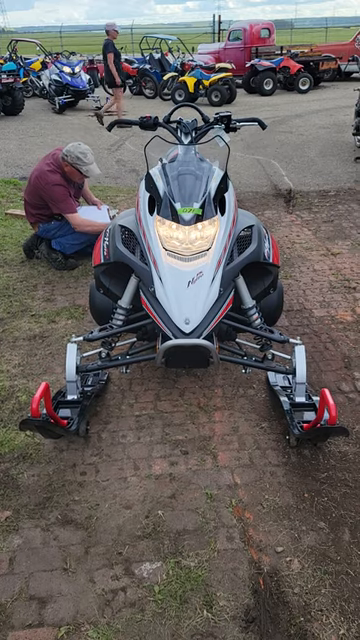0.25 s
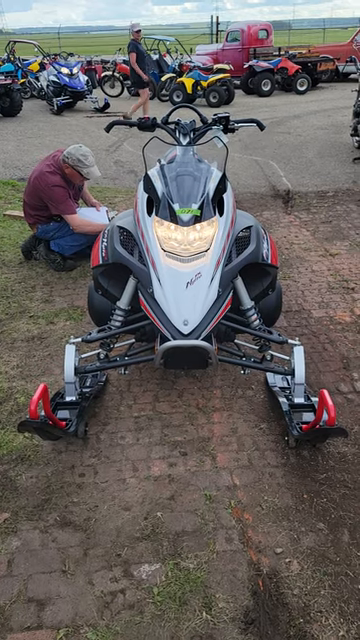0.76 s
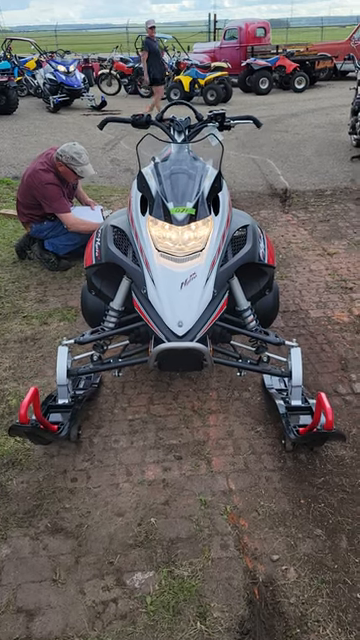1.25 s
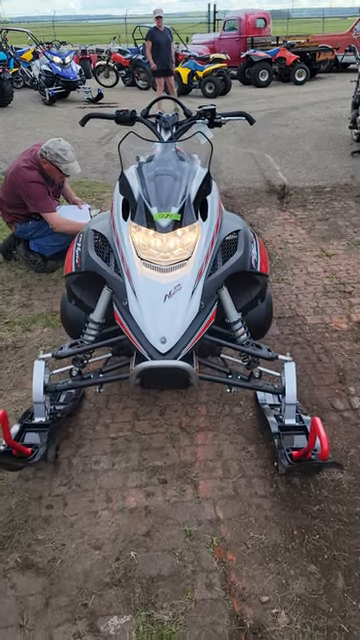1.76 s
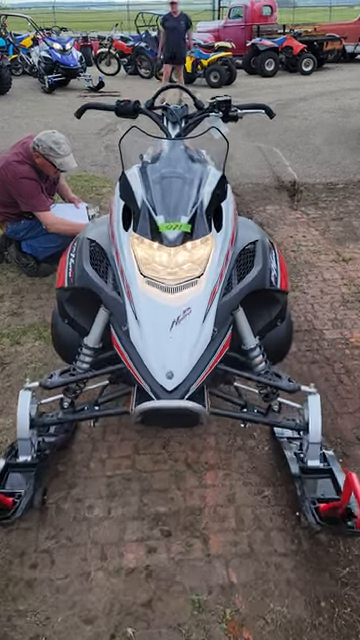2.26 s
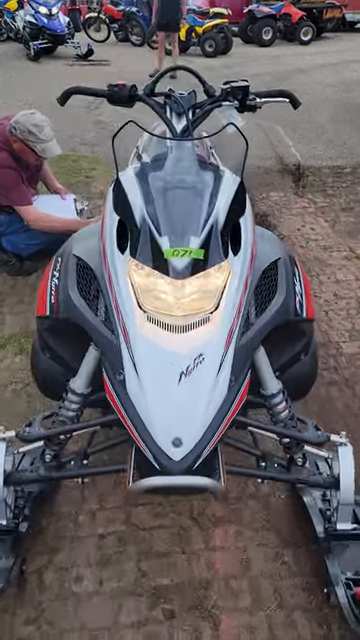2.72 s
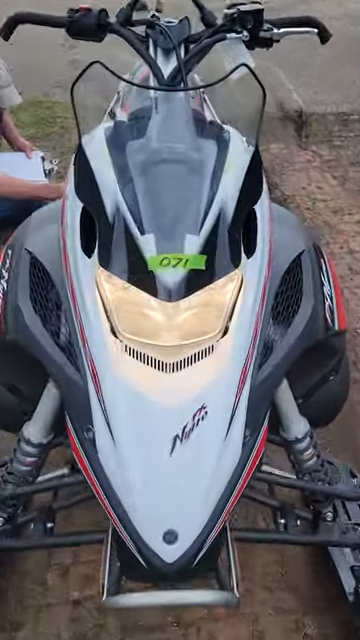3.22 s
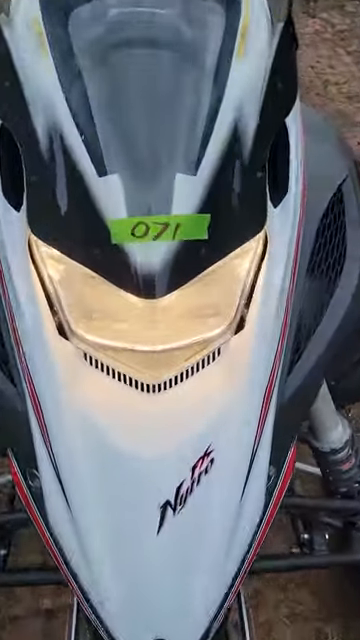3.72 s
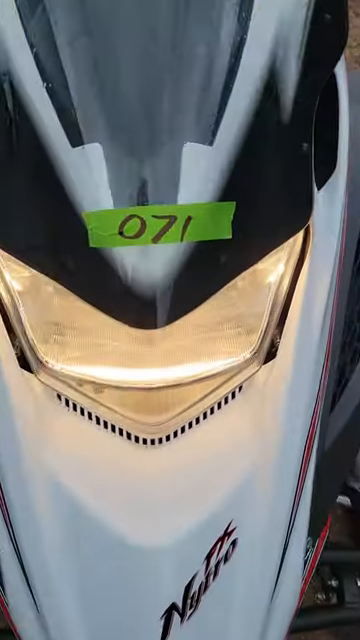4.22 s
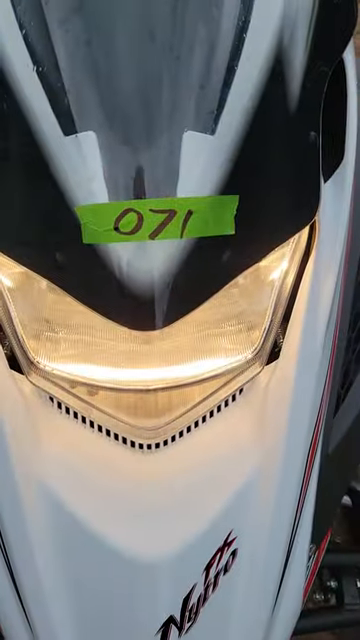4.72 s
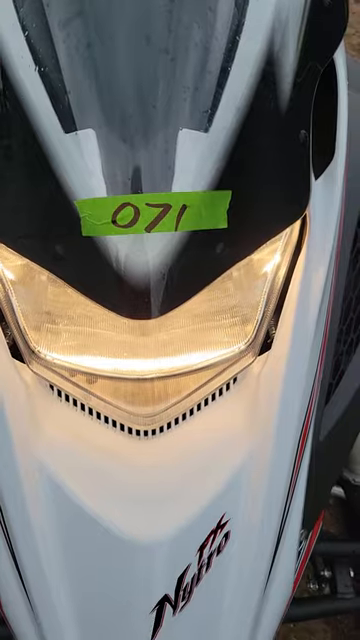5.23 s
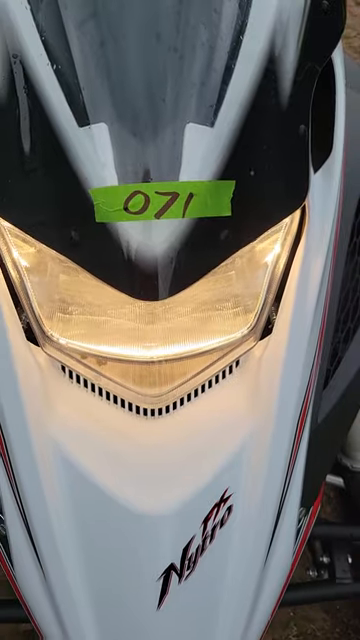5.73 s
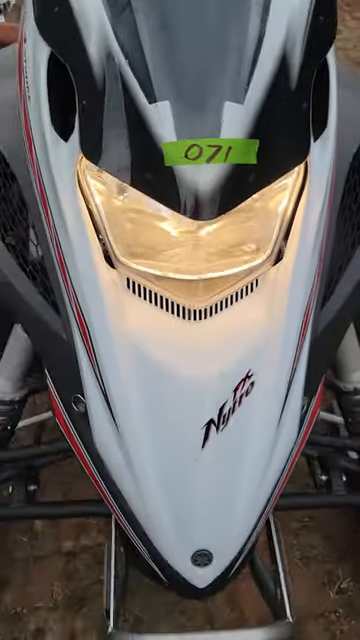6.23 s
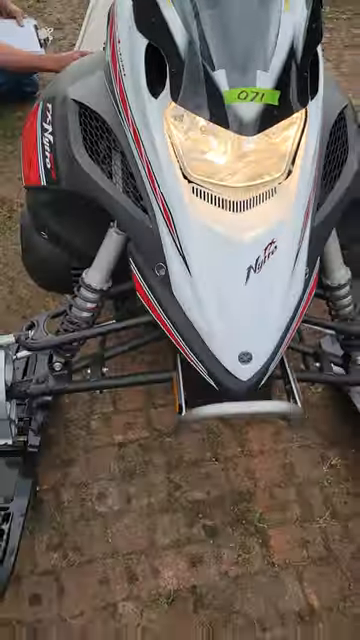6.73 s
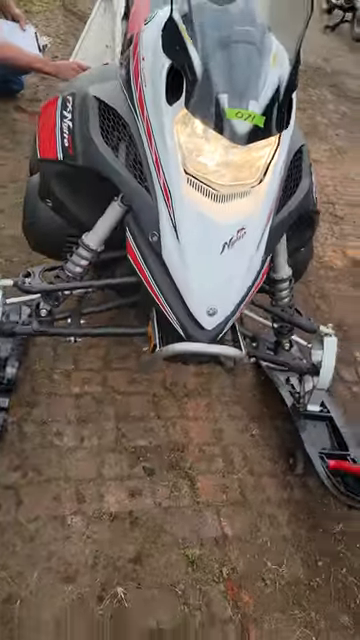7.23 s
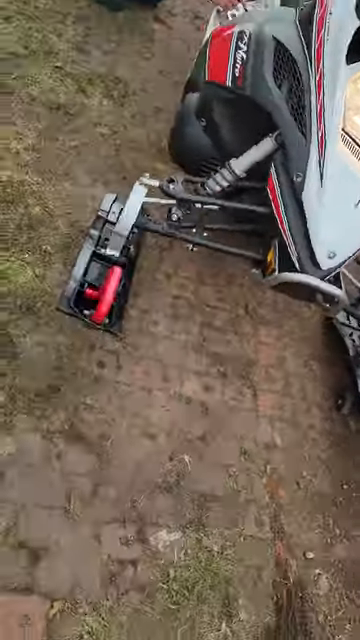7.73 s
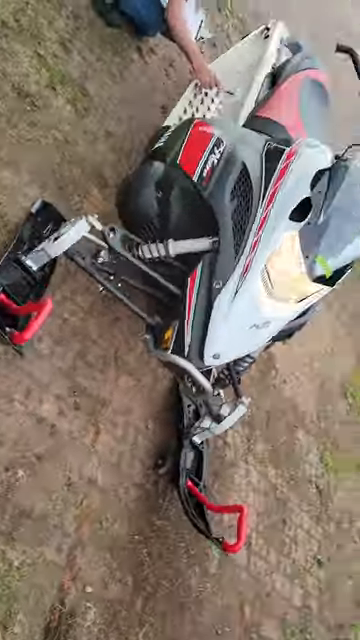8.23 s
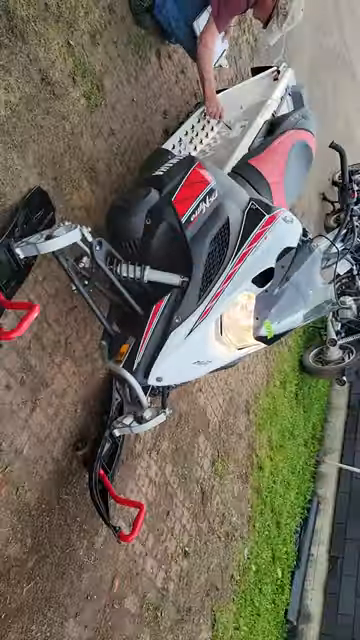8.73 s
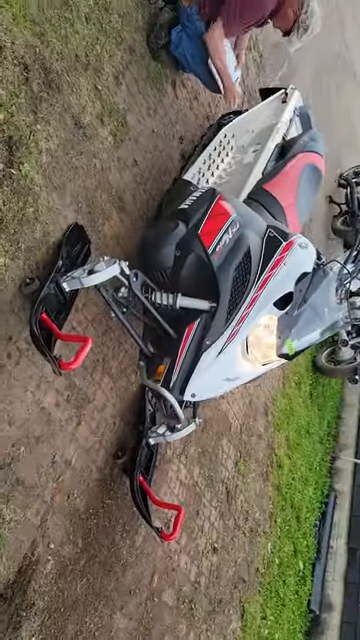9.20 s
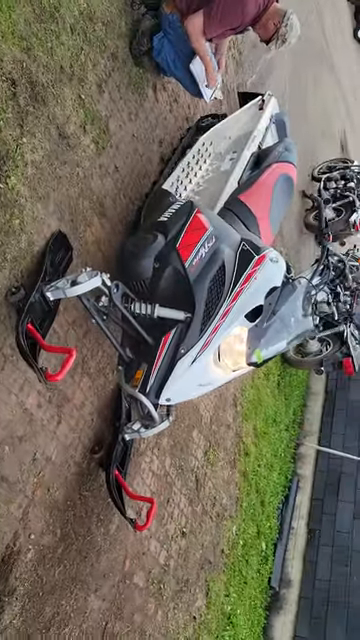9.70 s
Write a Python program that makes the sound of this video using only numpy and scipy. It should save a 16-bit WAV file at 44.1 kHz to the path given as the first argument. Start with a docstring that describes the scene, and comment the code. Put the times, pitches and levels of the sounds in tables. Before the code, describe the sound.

A three-cylinder snowmobile engine idles without stopping in an open yard. A deep exhaust drone throbs under dense mechanical clatter and hiss. The handheld microphone starts a little way off in front, moves in over the hood so the clatter gets louder and brighter, then backs away and around to the side.

```python
"""After a very short silence a three-cylinder four-stroke snowmobile engine idles in an open yard: an exhaust
drone on multiples of the firing rate under clatter, as the listener walks up, leans over the hood and steps
to the side. Phase-locked sines make the drone and coloured noise the rumble; contact impulses and hiss ring
through the hood panels, intake strokes excite airbox modes, a panel and an electric pump sing, one tick snaps."""
import sys
import numpy as np
from scipy import signal
from scipy.fft import rfft, irfft
from scipy.io import wavfile
from scipy.ndimage import uniform_filter1d, map_coordinates

SR = 44100
rng = np.random.default_rng(int(sys.argv[2]) if len(sys.argv) > 2 else 0)


def bounce(signal):
    """Save signal as a 16-bit WAV file at the path given by the first command-line argument."""
    frames = np.transpose(np.atleast_2d(signal))
    limited = np.clip(frames, -1, 1)
    pcm = np.round(limited * 32767).astype(np.int16)
    wavfile.write(sys.argv[1], SR, pcm)


N = 439236

# Throughout, values at "four places" are in front, at the corner, at the side, over the hood.
# unequal firing strength of the three cylinders: level/dB
CYLINDER_LEVELS = (-4., 0., 1.5)


def from_db(db):
    """Amplitude ratio from a level: 20 dB is a factor of ten."""
    return np.exp(np.asarray(db) * (np.log(10) / 20))


def rms_one(x):
    """Normalize the mean square, the signal power, to 1."""
    return x / np.sqrt(np.mean(x ** 2) + 1e-20)


def in_time(rows):
    """Linear interpolation of each column of a time table at every sample."""
    s, *columns = np.transpose(rows)
    return [np.interp(np.arange(N) / SR, s, c) for c in columns]


def at_hz(points, hz):
    """Spectrum table interpolated on a logarithmic frequency axis."""
    table_hz, values = np.transpose(points)
    return np.interp(np.log(hz), np.log(table_hz), values)


def drift(rate_hz):
    """Slow random fluctuation of rms 1: white noise through two equal low-pass poles."""
    step = 40      # the slow curve is drawn at every 40th sample
    r = np.exp(-2 * np.pi * rate_hz * step / SR)
    noise = rng.standard_normal(N // step + 2002)
    slow = signal.lfilter([1], [1, -2 * r, r * r], noise)[2000:]
    return np.interp(np.arange(N) / step, np.arange(len(slow)), rms_one(slow))


def dip(s, width_s, db):
    """A brief Gaussian change of level in dB."""
    return db * np.exp(-((np.arange(N) / SR - s) / width_s) ** 2)


def resonance(x, hz, width_hz):
    """One damped mode: a two-pole resonance of about unit gain at its peak."""
    r = np.exp(-np.pi * width_hz / SR)
    poles = [1, -2 * r * np.cos(2 * np.pi * hz / SR), r * r]
    return signal.lfilter([(1 - r * r) / 2, 0, (r * r - 1) / 2], poles, x)


def coloured(pair, spectrum):
    """Partial coherence: mix mid and side into a coloured left-right spectrum; returns (Hz, spectrum)."""
    # left-right correlation: f/Hz, likeness
    likeness = [(60, 1), (250, 0.16), (600, 0.28), (1400, 0.2), (3000, 0.1), (7000, 0.067), (15000, .1)]
    mid, side = rfft(pair)
    hz = np.maximum(np.arange(len(mid)) * SR / N, 5.)
    alike = np.clip(at_hz(likeness, hz), -1, 1)
    ports = np.sqrt(1 + alike) * mid + np.sqrt(1 - alike) * side * [[1], [-1]]
    return hz, from_db(at_hz(spectrum, hz)) * ports


def places():
    """Weights of the four places at each moment: interpolation between fixed listening positions."""
    # the walk: t/s, lean (0 standing off, 1 over the hood), turn (0 in front, .5 at the corner, 1 at the side)
    walk = [(0, 0.02, 0), (1.6, 0.029, 0), (2.4, 0.24, 0), (2.9, 0.47, 0.012), (3.6, .87, 0.13),
            (4.1, 1, 0.11), (5.6, 0.92, 0), (6.1, 0.89, 0.56), (6.7, 0.34, 0.43), (6.86, 0.27, 0.52),
            (7.2, 0.12, .5), (7.7, 0, 0.63), (8.1, 0.11, 0.71), (8.3, 0.18, 0.82), (8.8, 0.05, 0.97),
            (10, 0, 0.89)]
    lean, turn = np.clip(in_time(walk), 0, 1)
    standing = [(1 - lean) * np.interp(turn, (0, .5, 1), tent) for tent in np.eye(3)]
    return np.array([*standing, lean])


def placed(row, shares):
    """Level in dB and left-right gains at each moment: level difference gives direction."""
    db, pan_db = np.reshape(row, (2, 4)) @ shares
    return db, from_db([pan_db / 2, -pan_db / 2])


def lag_left(pair, lag_s):
    """Interaural-style time difference: read the left channel a changing time later."""
    moments = np.arange(N) - lag_s * SR
    left = map_coordinates(pair[0], [moments], order=3, mode="nearest")
    return np.array([left, pair[1]])


def strikes(turns, share, db, spread_db):
    """Periodic impulses of uneven strength, one each time the count passes this share of a turn."""
    passed = np.diff(np.floor(turns - share), prepend=np.floor(turns[0] - share)) > 0
    out = np.zeros(N)
    out[passed] = from_db(db + spread_db * rng.standard_normal(passed.sum()))
    return out


def combustions(firings, lead, spread_db):
    """Firing order: one impulse a firing, the cylinders in turn, three to a four-stroke cycle."""
    cycles = firings / 3 + lead
    return sum(strikes(cycles, k / 3, db, spread_db) for k, db in enumerate(CYLINDER_LEVELS))


def ticks(decay_s):
    """Impulsive radiation: exponentially decaying noise snaps, high-passed to be bright."""
    # lone bright tick: t/s, level/dB of the noise at onset before the high-pass, left minus right/dB
    snaps = [(7.1964, -35, 4)]
    length = 400
    out = np.zeros((2, N))
    tail = np.exp(-np.arange(length) / (decay_s * SR))
    for s, db, pan_db in snaps:
        noise = rng.standard_normal((2, length))
        i = round(s * SR)
        out[:, i:i + length] += from_db(db) * noise * tail * from_db([[pan_db / 2], [-pan_db / 2]])
    return signal.sosfilt(signal.butter(2, 4000, "high", fs=SR, output="sos"), out)


def pump(shares):
    """Doppler effect on an unsteady electric whine: sharp as the listener closes in, flat on moving off."""
    whine_hz, approach_m, sound_m_per_s = 3922, 2.0, 343
    levels_db = (-58, -66, -61, -51)      # at the four places
    closing_m_per_s = approach_m * uniform_filter1d(np.gradient(shares[-1]) * SR, size=SR)
    hz = whine_hz * (1 + closing_m_per_s / sound_m_per_s) + 1.5 * drift(8.)
    db = levels_db @ shares + 1.5 * drift(6.)
    tone = np.sqrt(2) * from_db(db) * np.sin(2 * np.pi * np.cumsum(hz) / SR)
    return tone * from_db([[-2.5], [1.5]])


def airbox(firings, shares):
    """Forced cavity modes: every intake stroke thumps the airbox, whose two modes beat."""
    # modes: f/Hz, relative level/dB (scaled by the decay), t60/s
    modes = [(496.2, 6, 0.077), (549, -2.5, 0.09)]
    # level/dB at the four places, then left minus right/dB at the same places
    row = (-44, -37, -48, -29.5, 13, 10, 14.5, -6.5)
    thumps = rms_one(combustions(firings, lead=.012, spread_db=1.5)) + .85 * rng.standard_normal((2, N))
    ringing = 0
    for hz, db, t60_s in modes:
        width_hz = np.log(1000) / (np.pi * t60_s)
        ringing = ringing + from_db(db) * t60_s * resonance(thumps, hz, width_hz)
    db, ports = placed(row, shares)
    return from_db(db) * ports * rms_one(ringing)


def side_panel(shares):
    """Narrow-band response of a plate: random shaking makes a side panel sing on one mode."""
    # level/dB at the four places, then left minus right/dB at the same places
    row = (-44, -36, -40.5, -38, -4, 4, 8, -10.5)
    # brief dip past the corner: t/s, width/s, level/dB
    fade = (8.35, .3, -7)
    mode_hz, width_hz = 910, 34
    shake = rng.standard_normal((2, N)) + 1.06 * rng.standard_normal(N)      # second term common to both sides
    singing = resonance(resonance(shake, mode_hz, width_hz), mode_hz, 2 * width_hz)
    db, ports = placed(row, shares)
    return from_db(db + dip(*fade)) * ports * rms_one(singing)


def mechanical_noise(firings, burst_db, burst_s, click_db, grit_per_s, grit_db, surge_db):
    """Impact excitation: contacts knock and rasp over steady air hiss, with loose grit ticks between."""
    # valve and piston contacts: share of the four-stroke cycle, relative level/dB
    contacts = [(.965, -2), (.0, -0.5), (.05, -1.5), (.135, 5), (.18, 3.5), (.28, -6), (.33, -0.5),
                (.365, 3), (.43, 0), (.5, -5), (.545, 0), (.655, 2), (.71, 0), (.745, -2), (.82, -3)]
    hits = 0
    for share, db in contacts:
        cycles = firings / 3 + .001 * drift(30.)      # slight timing jitter
        hits = hits + strikes(cycles, share, db, spread_db=0.5)
    grit_levels_db = grit_db + 1.9 * np.minimum(rng.exponential(1, N), 4)
    grit = (rng.random(N) < grit_per_s / SR) * from_db(grit_levels_db)
    tail = [1, -np.exp(-1 / (burst_s * SR))]      # exponential decay as a one-pole filter
    rasp = from_db(burst_db) * signal.lfilter([1], tail, hits) * rng.standard_normal((2, N))
    shape = rng.standard_normal((2, 300)) * np.exp(-np.arange(300) / (.0016 * SR))
    # the same ragged knock every cycle
    knock = from_db(click_db) * signal.fftconvolve([hits], shape, axes=1)[:, :N]
    struck_band = signal.butter(2, [500, 4200], "band", fs=SR, output="sos")
    struck = signal.sosfilt(struck_band, rasp + knock)
    hiss_gain = 1 + signal.lfilter([1], tail, grit) + from_db(20.5) * grit
    pair = struck + rng.standard_normal((2, N)) * hiss_gain
    # load changes move all bands together
    return pair * from_db(surge_db * (drift(3.) / 2 + drift(14.)))


def clatter(noise, shares):
    """Modal filtering and directivity: hood modes colour the mechanical noise, each band varying by place."""
    # hood and engine case modes: f/Hz, width/Hz, nominal peak gain/dB
    hood_modes = [(773, 19.4, 8), (1020, 68, 4.5), (1108, 34.5, 6.5), (1200, 43, 5.5), (1359, 86, 8.5),
                  (1562, 33, 4.5), (1698, 52, 5.5), (1903, 46, 9), (2060, 49, 8.5), (2246, 5.3, 8.5),
                  (2820, 44, 6.5), (2840, 69, -4.5), (10130, 130, 4)]
    # broad colour of the mechanical noise: f/Hz, relative level/dB per Hz
    case_colour = [(190, -30.5), (330, 3.5), (430, -2), (690, -4.5), (1070, -1), (1510, -5), (2020, -5),
                   (2400, -6.5), (3000, -4.5), (4600, -14.5), (6200, -18.5), (7100, -15.5), (8300, -18.5),
                   (9800, -27), (15700, -24.5)]
    # bands: f/Hz, level/dB at the four places, left minus right/dB at the same places;
    # levels shape each band's change in time and the total power, while the colour sets the balance
    bands = [(390, -44, -44.5, -40.5, -40, -7.5, -3, -9, 9.5), (710, -42, -43, -38, -38, -6, -4.5, 4, -2.5),
             (1270, -32.5, -35, -34.5, -27, -4.5, -0.5, 0.5, -3),
             (2000, -32, -32.5, -32, -27, -6.5, 2.5, -8, -5),
             (2940, -42, -42.5, -44.5, -34.5, -2.5, -2, 5, -7),
             (4300, -48.5, -48.5, -44.5, -45, -7, -4.5, -7.5, -7.5),
             (7100, -53.5, -52.5, -62, -50.5, -3.5, -1.5, 6, -3),
             (11800, -64.5, -61.5, -76, -58, -4, 1, -5.5, -5)]
    # steps of the treble while the listener turns round the corner: t/s, level/dB
    treble_steps = [(6.6, 0), (6.72, 2), (6.84, -2), (7.52, -1), (7.62, 1.5), (8.1, 0.5), (8.2, -2),
                    (8.4, 0.5), (8.8, 2), (9.1, 0.5)]
    treble_from_hz, dip_hz = 3500, 1950
    pair = noise
    for hz, width_hz, db in hood_modes:
        pair = pair + (from_db(db) - 1) * resonance(pair, hz, width_hz)
    hz, spectrum = coloured(pair, case_colour)
    treble_db, = in_time(treble_steps)
    # the band near 2 kHz dips briefly past the corner
    dip_db = dip(s=8.16, width_s=0.27, db=-7)
    centres = np.array(bands)[:, 0]
    out, power = 0, 0
    for (centre, *row), tent in zip(bands, np.eye(len(bands))):      # overlapping bands that sum to one
        band = irfft(spectrum * np.interp(np.log(hz), np.log(centres), tent), N)
        db, ports = placed(row, shares)
        db = db + treble_db * (centre > treble_from_hz)
        db = db + dip_db * (abs(np.log2(centre / dip_hz)) < 1 / 4)      # within a quarter octave
        out = out + from_db(db - db.mean()) * ports * band
        power = power + from_db(db) ** 2
    return np.sqrt(np.mean(power)) * rms_one(out)


def rumble(firings, shares, pulse_db):
    """Subharmonics and turbulence: unequal cylinder pulses and flow noise fill the gaps between orders."""
    # exhaust turbulence: f/Hz, relative level/dB per Hz
    turbulence = [(12, -36), (25, -18), (50, -12.5), (90, -0.5), (135, -11.5), (175, -19), (235, -5.5),
                  (290, -28), (400, -21.5), (900, -89)]
    # level/dB at the four places
    levels_db = (-29, -31, -29.5, -28)
    even = strikes(firings, 0, 0, 0) * from_db(CYLINDER_LEVELS).mean()
    # the difference leaves lines at a third of the firing rate
    uneven = combustions(firings, lead=0, spread_db=1.5) - even
    # the pulses go to mid alone
    pair = rng.standard_normal((2, N)) + from_db(pulse_db) * rms_one(uneven) * [[1], [0]]
    _, spectrum = coloured(pair, turbulence)
    return from_db(levels_db @ shares) * rms_one(irfft(spectrum, N))


def drone(firings, per_s, shares, waver_db, waver_rad):
    """Fourier series of the exhaust pulses: no two combustions are alike, so higher orders waver more."""
    # exhaust orders: multiple of the firing rate, level/dB at the four places
    orders = [(2, -14, -16, -15.5, -13.5), (3, -19, -18.5, -31.5, -18), (4, -23.5, -25, -40.5, -33.5),
              (5, -45, -55.5, -34, -32), (6, -37, -40.5, -39, -54), (7, -36, -33.5, -42.5, -43.5),
              (8, -39, -38, -33.5, -33)]
    # the pipe delays and spreads each pulse: phase/rad per order, per squared order above the second
    pulse_smear = (2.1, .4)
    # more pulse delay at the four places: phase/rad per order above the second
    smear_at = (0, .25, 1.7, .2)
    first_order_db, idle_mean_per_s = -34.5, 37.6
    rev_db_per_hz, pull_db_per_hz_s = 1, -0.01      # second order follows speed and acceleration
    port_lead_rad = .55      # left ahead of right at the firing rate, less in higher orders
    opposed_order = 8        # arrives reversed over the hood, so it cancels on the way in and out
    pull_hz_per_s = uniform_filter1d(np.gradient(per_s) * SR, size=SR // 10)
    swell_db = rev_db_per_hz * (per_s - idle_mean_per_s) + pull_db_per_hz_s * pull_hz_per_s
    smear = pulse_smear[0] + smear_at @ shares
    out = np.zeros((2, N))
    for order, *db in [(1, *[first_order_db] * 4), *orders]:
        signs = [1, 1, 1, -1 if order == opposed_order else 1]
        gain = (from_db(db) * signs) @ shares
        if order == 2:
            gain = gain * from_db(swell_db)
        above = order - 2
        phase = 2 * np.pi * order * firings + smear * above + pulse_smear[1] * above ** 2
        phase = phase + waver_rad * above * drift(13.0)
        skew_rad = .3 * max(order - 5, 0)      # short waves reach the two ports by changing paths
        lead_rad = port_lead_rad / order + skew_rad * drift(0.27)
        phase = phase + lead_rad * np.array([[.5], [-.5]])
        waver = from_db(waver_db * np.sqrt(abs(above)) * drift(35.0))
        out += np.sqrt(2) * gain * waver * np.cos(phase)
    return out * from_db([[-.55], [.55]])


def scene():
    """Superposition of pump, tick, panels, mechanics and exhaust at two ports, left and right."""
    # idle hunting: t/s, firing rate f/Hz
    idle = [(0.0, 36.1), (0.36, 37.58), (0.72, 37.46), (0.91, 37.91), (1.09, 37.08), (1.45, 38.83),
            (1.81, 35.9), (2.17, 38.57), (2.35, 39.33), (2.54, 36.3), (2.9, 37.97), (4.17, 36.82),
            (4.35, 38.48), (4.53, 37.51), (4.89, 38.16), (5.07, 37.41), (5.25, 38.72), (5.43, 37.33),
            (5.61, 38.43), (5.79, 37.32), (6.52, 37.41), (6.7, 36.85), (7.06, 38.14), (7.61, 37.11),
            (7.79, 38.51), (8.15, 36.62), (8.69, 39.15), (8.87, 37.05), (9.05, 37.52), (9.24, 37.0),
            (9.42, 38.35), (9.96, 36.76)]
    # how much later the hood reaches the left port at the four places: t/s
    left_lag = (.00017, -.0002, -.0002, 0)
    per_s, = in_time(idle)
    firings = -.278 + np.cumsum(per_s) / SR      # running count of firings
    shares = places()
    background = pump(shares) + ticks(decay_s=.0012)
    intake_and_panel = airbox(firings, shares) + side_panel(shares)
    noise = mechanical_noise(firings, burst_db=-3.5, burst_s=0.0089, click_db=7.5, grit_per_s=120,
                             grit_db=-17.0, surge_db=.55)
    hood = lag_left(clatter(noise, shares), left_lag @ shares)
    exhaust = rumble(firings, shares, pulse_db=-6.0)
    exhaust = exhaust + drone(firings, per_s, shares, waver_db=1.1, waver_rad=.06)
    return background + intake_and_panel + hood + exhaust


def record(dry):
    """Band limitation: sound starts after a short silence and a steep low-pass cuts the top."""
    start_s, cutoff_hz = .0615, 15740
    gate = np.arange(N) > start_s * SR
    low_pass = signal.ellip(13, .2, 70, cutoff_hz, fs=SR, output="sos")
    return signal.sosfilt(low_pass, dry * gate)


dry = scene()
out = record(dry)
bounce(out)
```